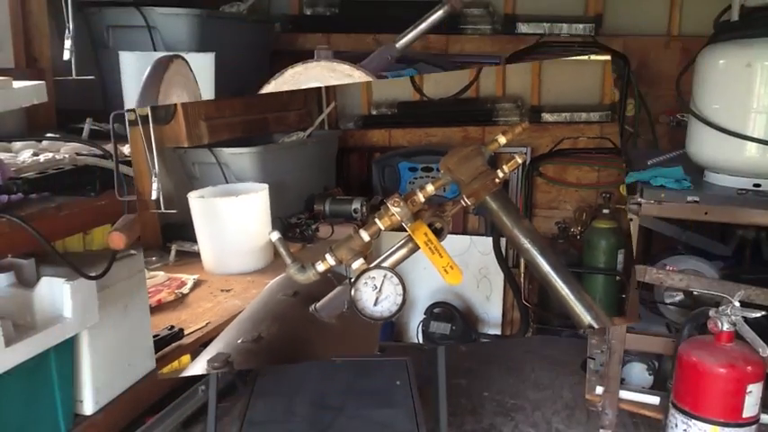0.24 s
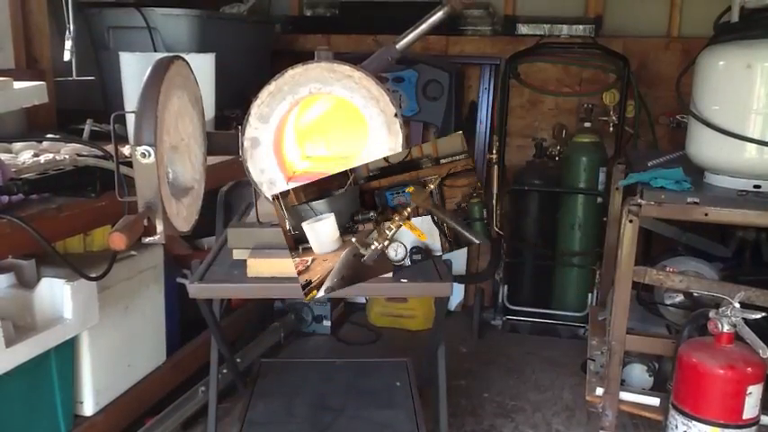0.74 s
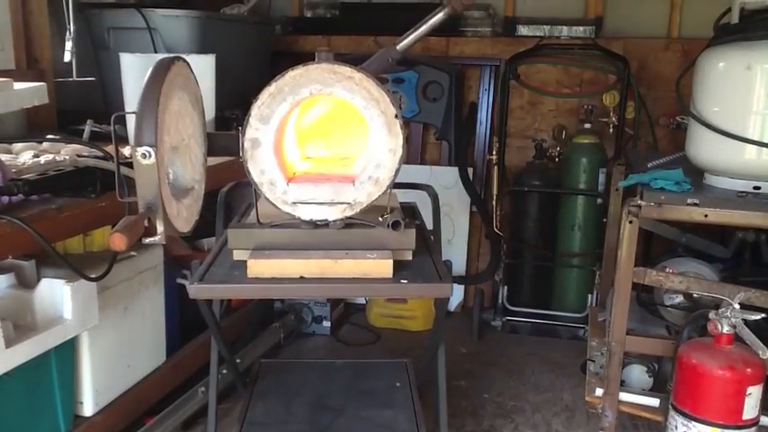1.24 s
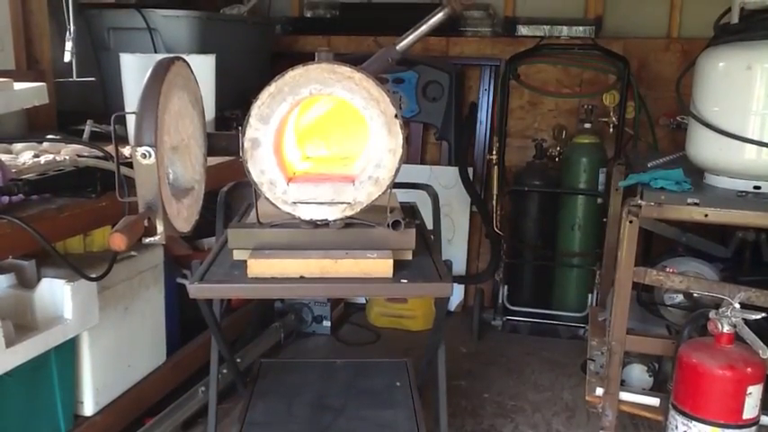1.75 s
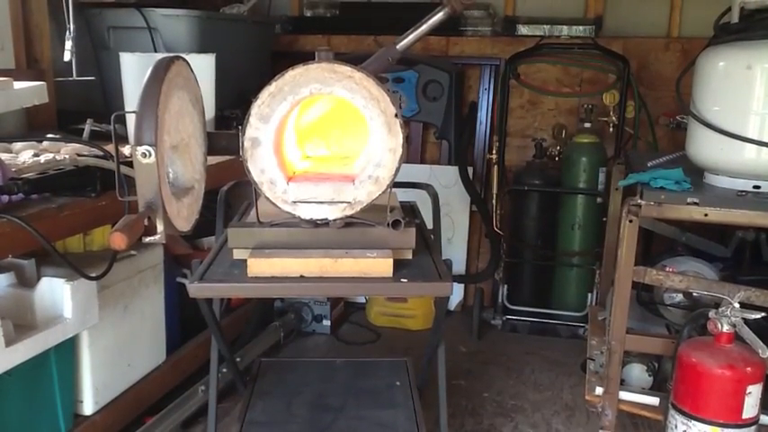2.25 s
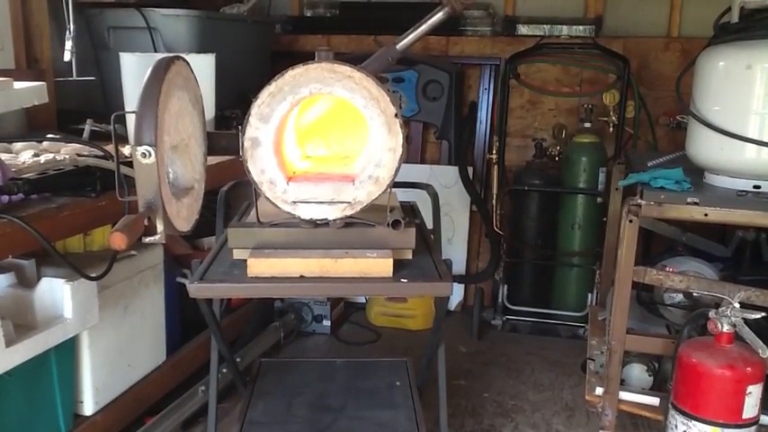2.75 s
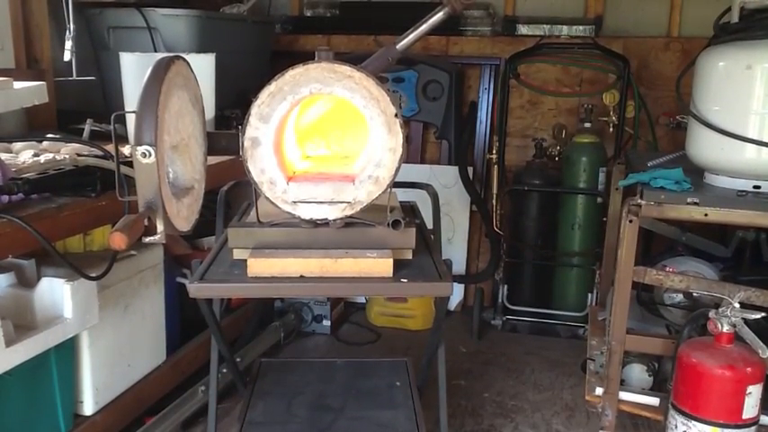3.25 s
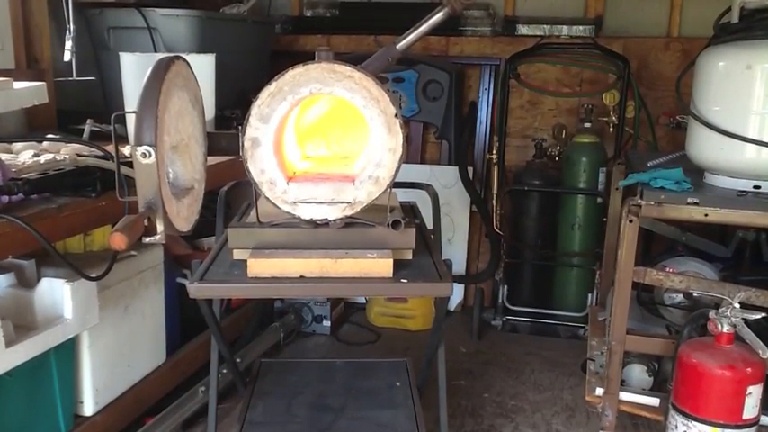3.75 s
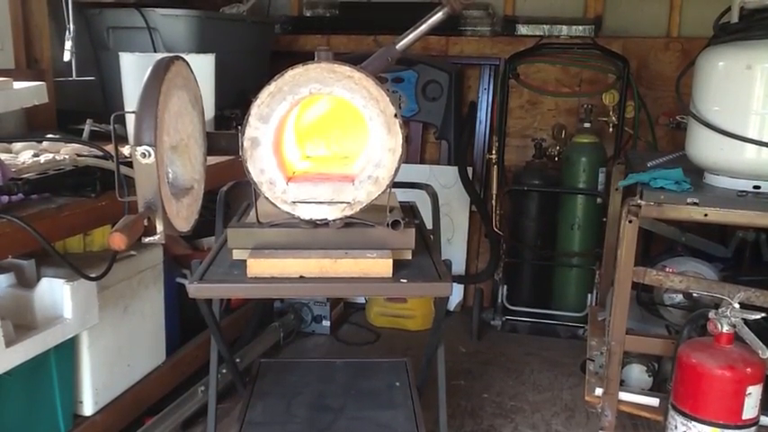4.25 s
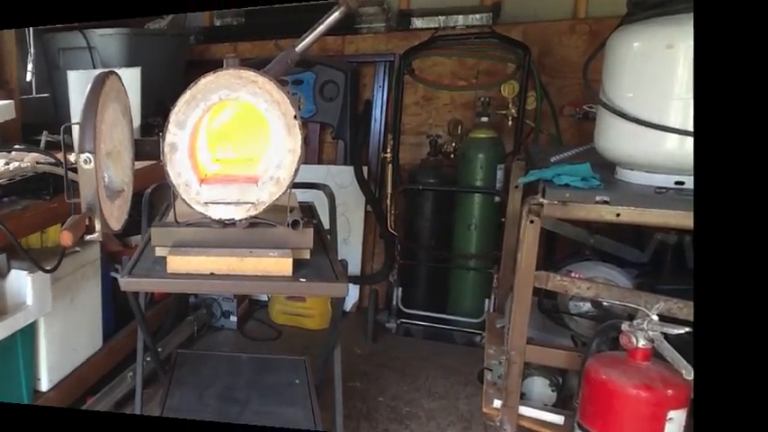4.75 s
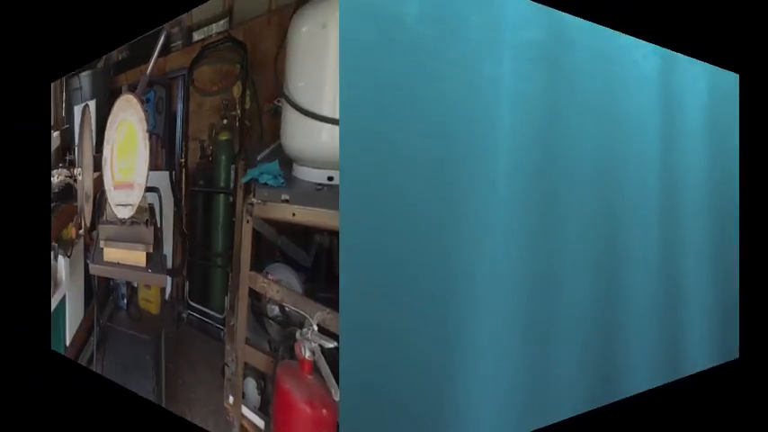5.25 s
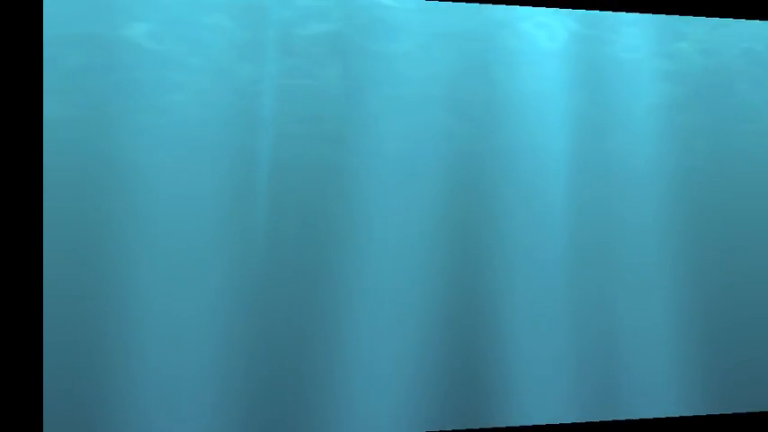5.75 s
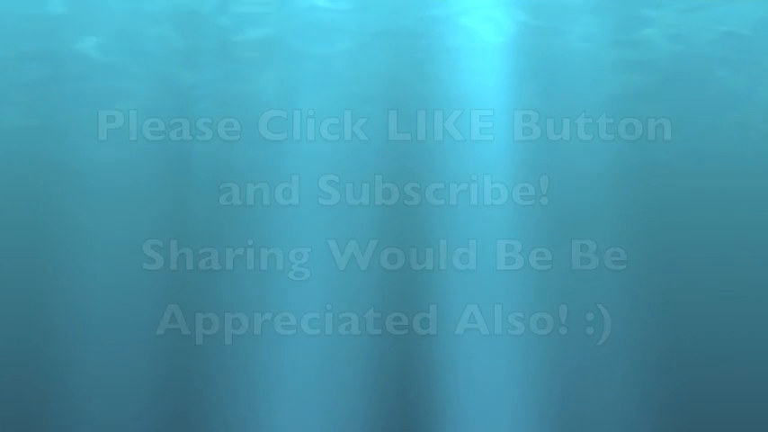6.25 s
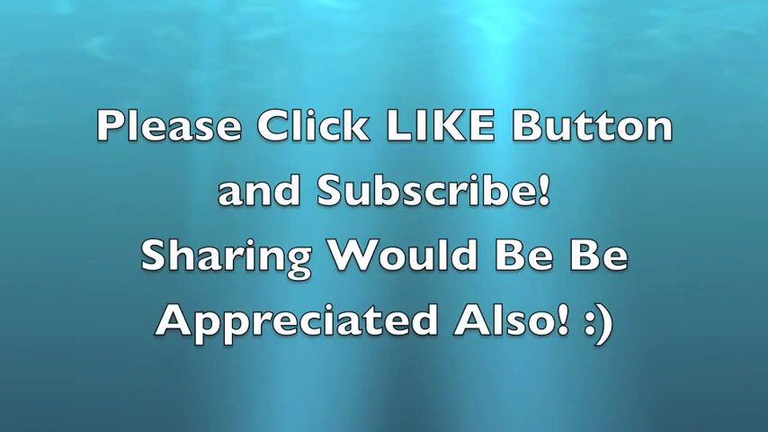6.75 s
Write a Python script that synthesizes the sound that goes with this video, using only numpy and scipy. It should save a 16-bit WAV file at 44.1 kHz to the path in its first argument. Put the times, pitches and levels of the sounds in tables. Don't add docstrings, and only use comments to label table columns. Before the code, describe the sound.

In a wooden shed, a gas burner roars into a round forge a few metres from the microphone. A low, hollow rumble dominates, with a much quieter hiss of the gas jet and faint flickering high whistles. The sound starts quiet, rises over the first second and a half, holds steady, then fades gradually to silence.

```python
import sys
import numpy as np
from scipy import signal
from scipy.fft import rfft, irfft
from scipy.io import wavfile
from scipy.ndimage import uniform_filter1d

SR = 44100
rng = np.random.default_rng(int(sys.argv[2]) if len(sys.argv) > 2 else 0)


def linear_from_db(decibels):
    return 10 ** (np.asarray(decibels, float) / 20)


def output_pcm(signal):
    pcm = np.clip(np.atleast_2d(signal).T, -1, 1) * 32767
    wavfile.write(sys.argv[1], SR, np.round(pcm).astype(np.int16))


N = 308680
TIME_S = np.arange(N) / SR
HZ = np.maximum(np.arange(N // 2 + 1) * SR / N, 1)


def level(x, rms_db):
    return x * linear_from_db(rms_db) / np.sqrt(np.mean(x ** 2))


def walk(rate_hz):
    hold = int(SR / rate_hz)
    steps = np.repeat(rng.standard_normal(N // hold + 1), hold)
    return 1.1 * uniform_filter1d(uniform_filter1d(steps, hold), hold)[:N]


def swells(rows):
    return sum(lift_db * 0.5 ** ((2 * (TIME_S - start_s) / length_s) ** 2)
               for start_s, length_s, lift_db in rows)


def colour(x, spectrum, modes):
    hz, db = np.transpose(spectrum)
    gain_db = np.interp(np.log(HZ), np.log(hz), db)
    for mode_hz, width_hz, mode_db in modes:
        gain_db = gain_db + mode_db / (1 + (2 * (HZ - mode_hz) / width_hz) ** 2)
    return irfft(rfft(x) * linear_from_db(gain_db), N)


def turbulence(lowest_hz, shared_db, own_db, rate_hz, count=9):
    white = rfft(rng.standard_normal(N))
    surge = walk(rate_hz)
    place = np.clip(2 * np.log2(HZ / lowest_hz), 0, count - 1)
    out = 0
    for k in range(count):
        overlap = np.cos(np.pi / 2 * np.clip(place - k, -1, 1)) ** 2
        band = irfft(white * overlap, N)
        out = out + band * linear_from_db(shared_db * surge + own_db * walk(rate_hz))
    return out


# freq_hz, level_db
FLAME_SPECTRUM = [(25, -53), (60, -47), (80, -34), (100, -18), (160, -6), (250, -6), (340, -2), (450, -8),
                  (600, -12), (690, -17.5), (730, -27), (900, -28), (1200, -38.5), (1600, -52.5)]
# freq_hz, width_hz, level_db
CHAMBER_MODES = [(108, 25, 3.5), (133, 12.6, -9), (170.9, 8.6, 7), (193.5, 6.6, -19.5), (214.5, 8, 2.5),
                 (242, 24, 7.5), (307.3, 12.4, -5.5), (327.8, 29, 6), (358, 12, 5.5), (380, 21.7, -14.5),
                 (444, 11, 4), (513.5, 17, -19.5), (550, 28, 4), (581, 14, -5.5), (620, 41, 1),
                 (642.8, 18, -13), (678, 33, 4.5), (711, 14, -9.5), (751, 35, 5), (860.4, 29, 6.5),
                 (1054, 25.2, 7), (1105, 25, -2.5), (1132, 41, 5.5)]
# start_s, level_db
FLAME_SURGES = [(.0, -0.5), (.15, 0), (.55, 0.5), (.78, 0.5), (1.0, -1), (1.22, 1.5), (1.9, 1), (2.3, 0),
                (2.95, 2), (3.1, 1), (3.55, -0.5), (4.35, -0.5), (4.62, 0), (5.55, -0.5)]


def flame():
    surge_s, flame_db = 0.14, -22
    burning = turbulence(70, shared_db=0.19, own_db=0.6, rate_hz=9.0)
    roar = level(colour(burning, FLAME_SPECTRUM, CHAMBER_MODES), flame_db)
    return roar * linear_from_db(swells((start_s, surge_s, db) for start_s, db in FLAME_SURGES))


def shed(x):
    t60_s, first_echo_s, echo_db = 0.3, 0.004, -7
    t = np.arange(SR // 2) / SR
    tail = rng.standard_normal(len(t)) * linear_from_db(-60 * t / t60_s) * (t > first_echo_s)
    tail = tail / np.sqrt(np.sum(tail ** 2))
    return x + linear_from_db(echo_db) * signal.fftconvolve(x, tail)[:N]


# freq_hz, level_db
HISS_SPECTRUM = [(700, -16), (1100, -6.5), (1400, -7.5), (1600, -2), (2000, -0.5), (2500, -4.5), (3800, -9),
                 (4200, -14), (6000, -12.5), (9000, -22), (10500, -14), (15000, -27)]
# freq_hz, width_hz, level_db
TUBE_MODES = [(1585, 40, 5), (1660, 30, -4), (1727, 30, 5), (1790, 60, -4), (1940, 100, 4), (2175, 40, 5),
              (2335, 30, -6), (2550, 80, -5), (2670, 80, 3), (3255, 60, 6), (3500, 80, -3), (3850, 110, 5),
              (4430, 70, 7), (7240, 100, 2), (9940, 70, 3), (10200, 90, 3), (10700, 60, 2)]
# start_s, level_db
GAS_GUSTS = [(.53, 0.5), (.73, 2), (1.45, .7), (2.0, 0.5), (2.15, -0.5), (2.65, 1.5), (2.9, 2), (3.17, 1),
             (3.45, 3.2), (3.7, 1), (4.28, -0.5), (4.53, 1.6), (5.55, .7)]


def hiss():
    gust_s, hiss_db = 0.09, -48.5
    jet = turbulence(1000, shared_db=0.7, own_db=1.6, rate_hz=40.0)
    jet = level(shed(colour(jet, HISS_SPECTRUM, TUBE_MODES)), 1.96)
    return jet * linear_from_db(hiss_db + swells((start_s, gust_s, db) for start_s, db in GAS_GUSTS))


def edge_tone(pitch_hz, drift_hz, waver_hz, flicker_db):
    pitch = pitch_hz + drift_hz * walk(8.0) + waver_hz * walk(260.0)
    flicker = walk(45.0)
    flicker = flicker - uniform_filter1d(flicker, size=SR // 8)
    tone = np.sin(2 * np.pi * np.cumsum(pitch) / SR)
    return np.sqrt(2) * linear_from_db(flicker_db * flicker) * tone


# pitch_hz, drift_hz, waver_hz, flicker_db
EDGE_TONES = [(6000, 14, 30, 3.5), (8565, 12, 60, 4.0), (9385, 12, 55, 4.5)]
# start_s, length_s, lift_db
LOW_SWELLS = [(.15, 0.15, -8), (.33, .08, -11), (.6, .12, -8), (1.22, .07, -9.5), (1.41, .05, -8),
              (1.6, .06, -4), (2.018, .16, 5), (2.41, .12, -8), (2.55, .08, -5), (2.76, 0.091, -2.5),
              (2.88, .1, 3.5), (3.04, .1, -4.5), (3.36, .05, -4), (3.52, .07, -5), (3.72, .12, 3),
              (3.92, .05, -2.5), (4.302, .08, 4), (4.68, .12, 3), (5.95, .12, -2)]
# start_s, length_s, lift_db
MIDDLE_BURSTS = [(.95, .06, 11), (1.26, .12, 10), (3.46, .09, 12), (3.72, 0.18, 8), (3.9, 0.26, 14),
                 (4.22, .17, 14), (4.52, .13, 14), (4.72, 0.064, 16), (5.39, 0.22, 12), (5.62, .1, 13),
                 (5.85, .09, 14), (6.03, .17, 13)]
# start_s, length_s, lift_db
HIGH_BURSTS = [(.07, .1, 7), (1.46, .13, 9), (1.85, .06, 6), (2.02, .1, 11), (2.34, 0.093, 11),
               (2.52, .08, 8), (2.65, .1, 6), (2.9, .2, 10), (3.25, .09, 7), (5.45, .15, 3)]


def whistles():
    whistle_db = 4.5
    low, middle, high = EDGE_TONES
    out = 0
    for tone, rest_db, rows in [(low, -63.5, LOW_SWELLS),
                                (middle, -79, MIDDLE_BURSTS),
                                (high, -75, HIGH_BURSTS)]:
        out = out + linear_from_db(rest_db + whistle_db + swells(rows)) * edge_tone(*tone)
    return out


def resonance(freq_hz, width_hz):
    response = 1 / (1 + (2 * (HZ - freq_hz) / width_hz) ** 2)
    return level(irfft(rfft(rng.standard_normal(N)) * response, N), 0)


# start_s (centre), length_s (bell sigma), freq_hz, width_hz, level_db
FLUTTERS = [
    (1.335, 0.0095, 1230, 346, -40.5),
    (3.72, .09, 3255, 50, -58.5),
    (5.74, 0.013, 1920, 250, -46),
]


def flutter():
    out = 0
    for start_s, length_s, freq_hz, width_hz, level_db in FLUTTERS:
        bell = np.exp(-0.5 * ((TIME_S - start_s) / length_s) ** 2)
        out = out + linear_from_db(level_db) * bell * resonance(freq_hz, width_hz)
    return out


def scene():
    return (flame() + hiss() + whistles() + flutter())[None]


# freq_hz, level_db
PATCH_FLOOR = [(3000, -5), (4600, -1.5), (6500, -2.5), (9000, -1), (11000, -2), (13500, .9), (15000, -1)]


def camera(x):
    hz, s, cells = signal.stft(x, SR, nperseg=2048)
    power = np.abs(cells) ** 2
    patch = uniform_filter1d(uniform_filter1d(power, size=3, axis=0), size=3, axis=1)
    log_power = np.log(power + 1e-30)
    near = np.exp(uniform_filter1d(uniform_filter1d(log_power, size=40, axis=0), size=9, axis=1))
    floor_db = np.interp(hz, *np.transpose(PATCH_FLOOR), left=-60)[:, None]
    floor_db = floor_db + np.interp(s, [1.5, 3.5], [-1.2, 0])
    kept = cells * (patch > near * linear_from_db(2 * floor_db))
    return signal.istft(kept, SR, nperseg=2048)[1][:N]


def low_pass(x):
    return signal.sosfilt(signal.butter(12, 15300, fs=SR, output="sos"), x)


# start_s, gain
FADER_MOVES = [
    (0, .275),
    (1.45, 1),
    (4.3, 1),
    (6.302, 0),
]


def record(dry):
    gain = np.interp(TIME_S, *np.transpose(FADER_MOVES))
    mix = camera(dry[0])[None] * gain
    return low_pass(mix)


dry = scene()
out = record(dry)
output_pcm(out)
```